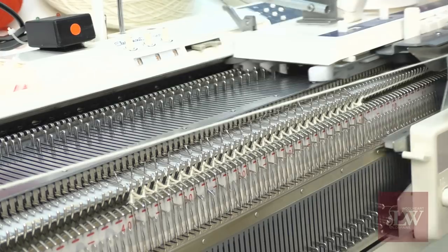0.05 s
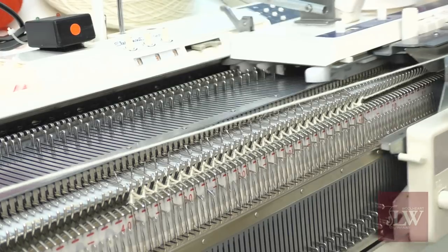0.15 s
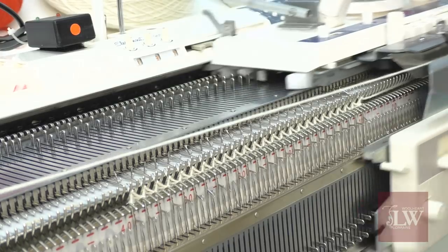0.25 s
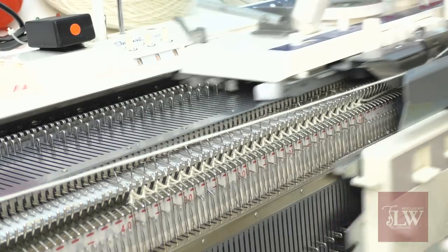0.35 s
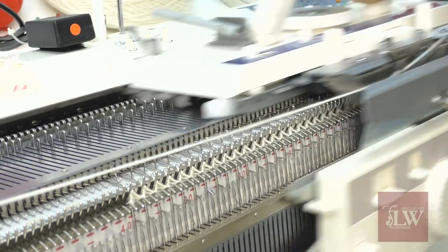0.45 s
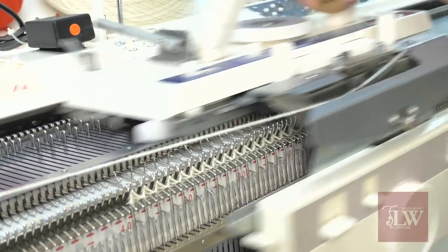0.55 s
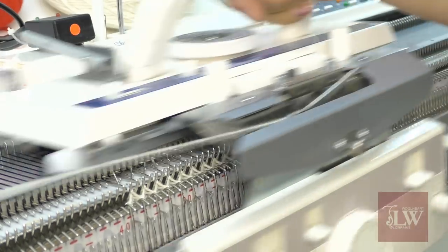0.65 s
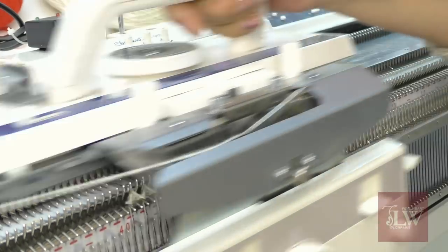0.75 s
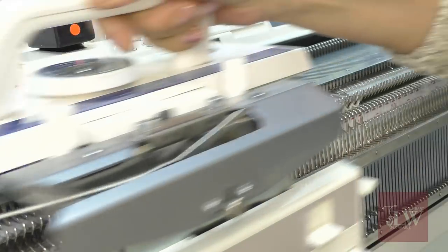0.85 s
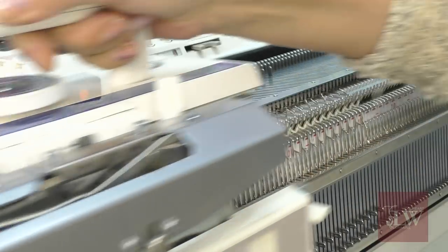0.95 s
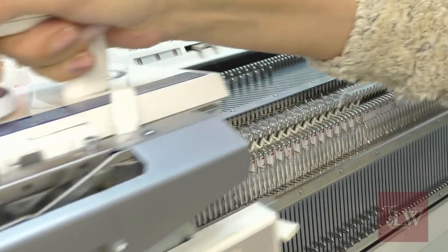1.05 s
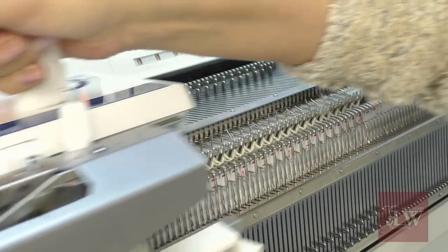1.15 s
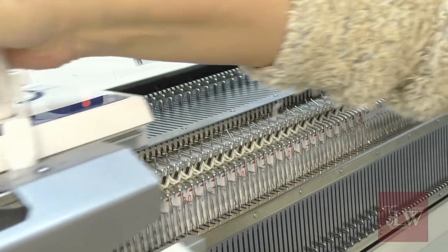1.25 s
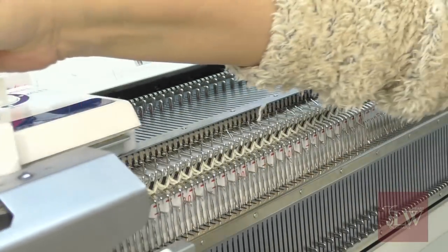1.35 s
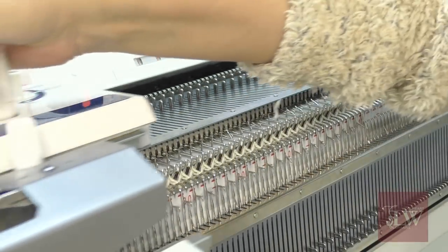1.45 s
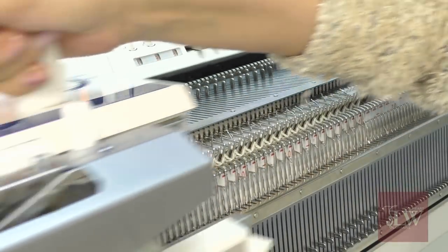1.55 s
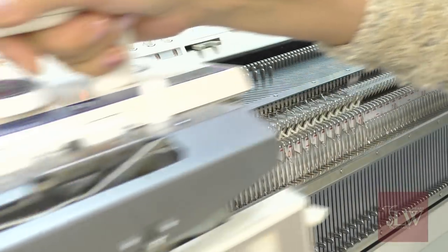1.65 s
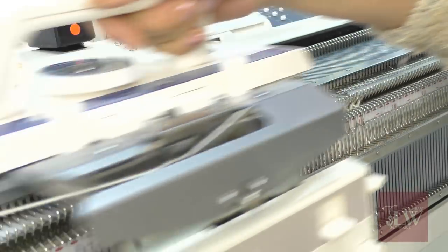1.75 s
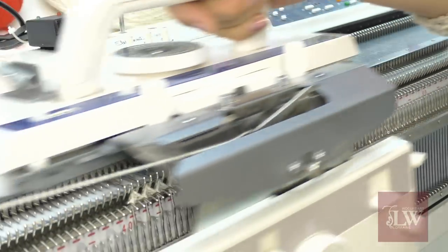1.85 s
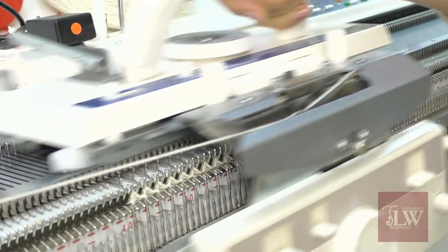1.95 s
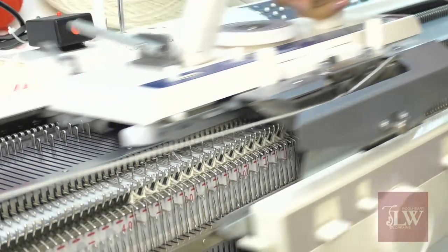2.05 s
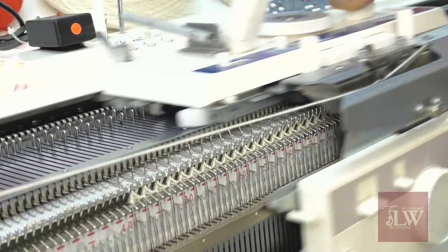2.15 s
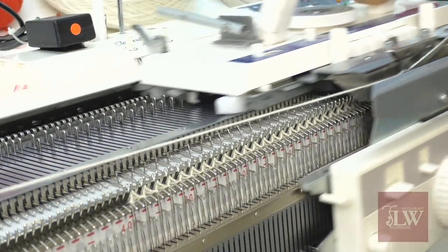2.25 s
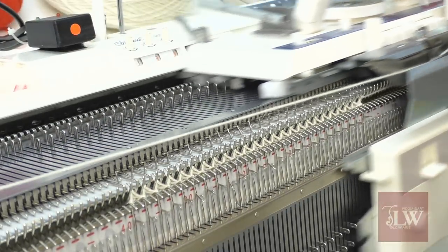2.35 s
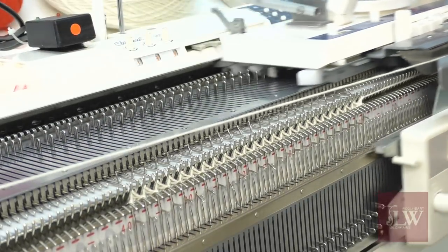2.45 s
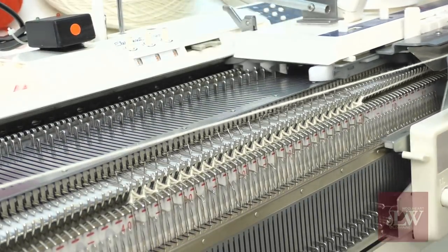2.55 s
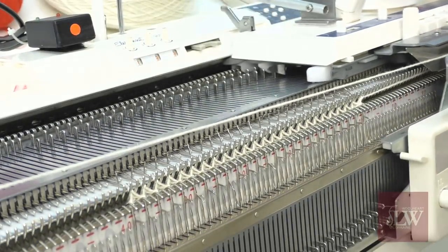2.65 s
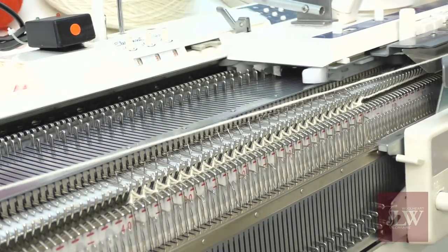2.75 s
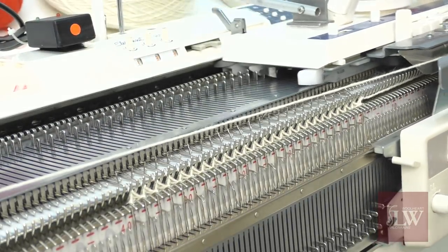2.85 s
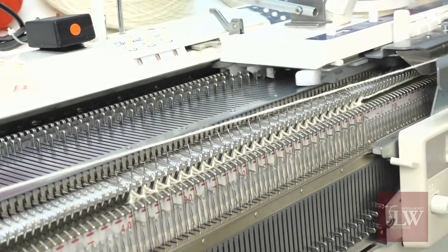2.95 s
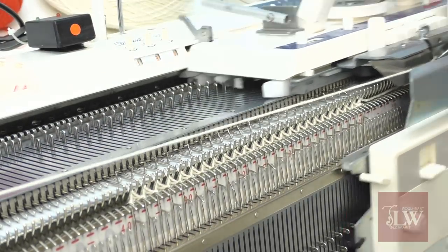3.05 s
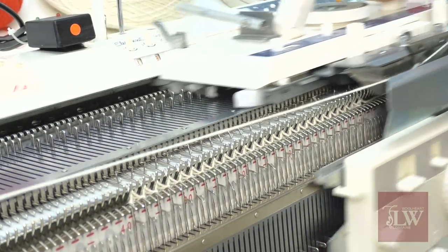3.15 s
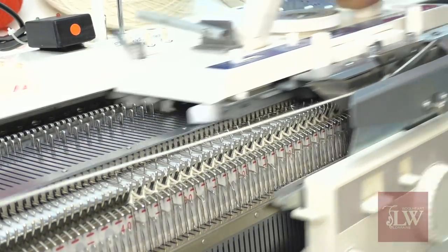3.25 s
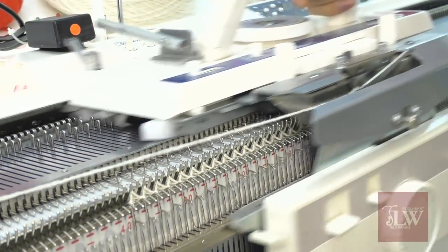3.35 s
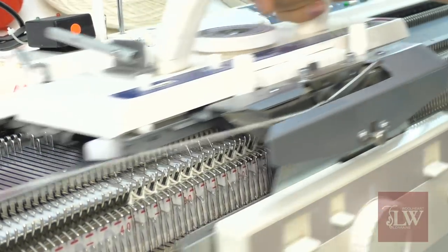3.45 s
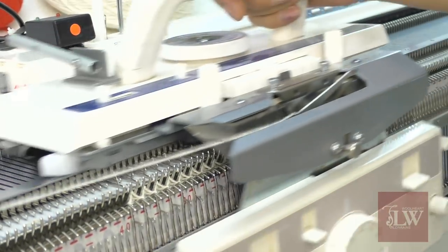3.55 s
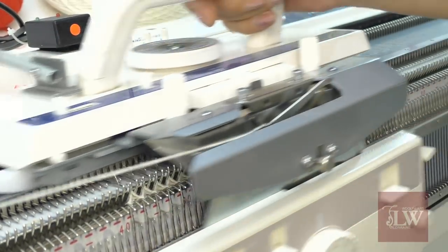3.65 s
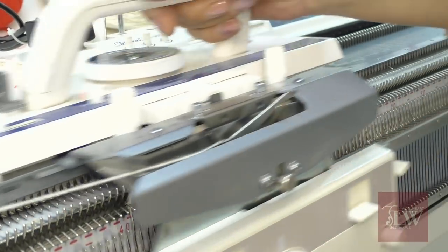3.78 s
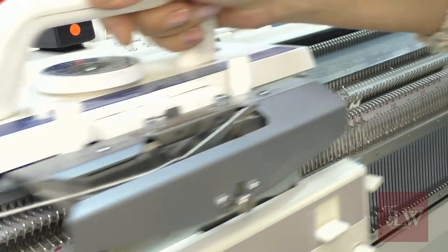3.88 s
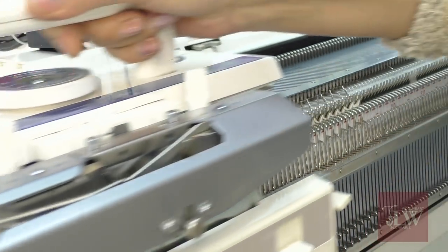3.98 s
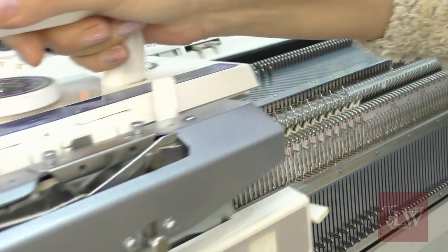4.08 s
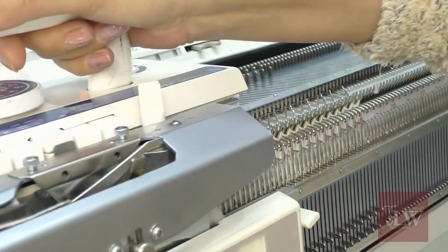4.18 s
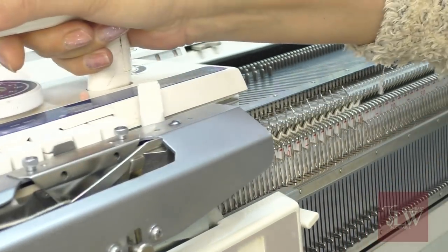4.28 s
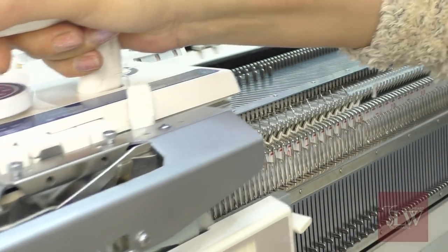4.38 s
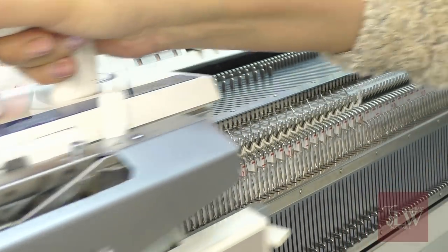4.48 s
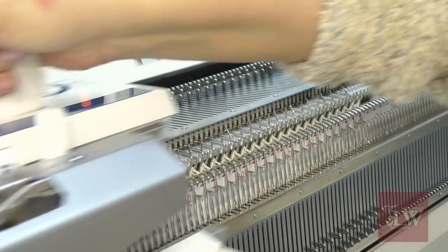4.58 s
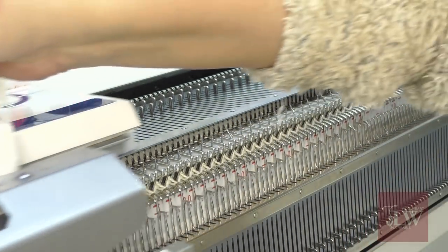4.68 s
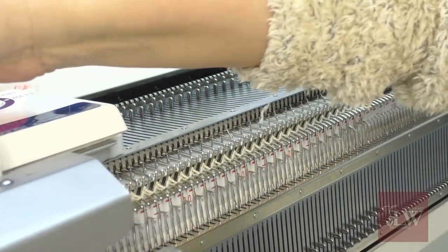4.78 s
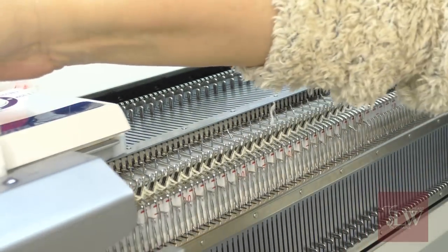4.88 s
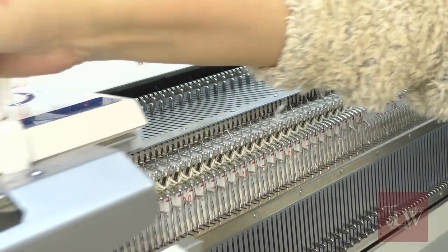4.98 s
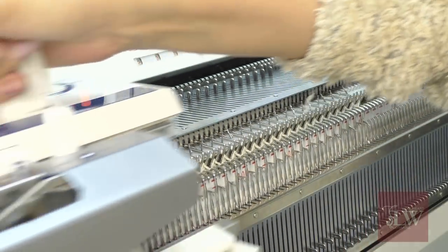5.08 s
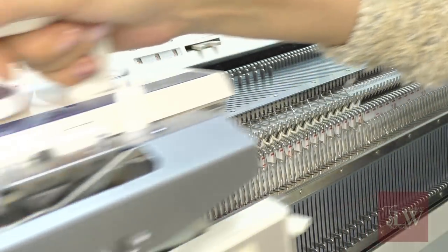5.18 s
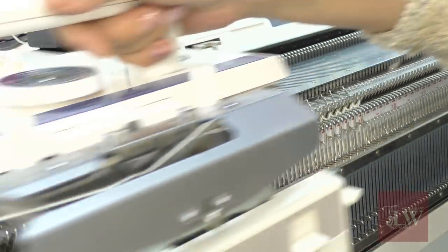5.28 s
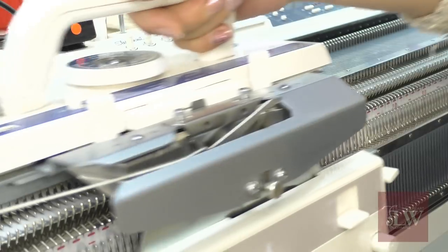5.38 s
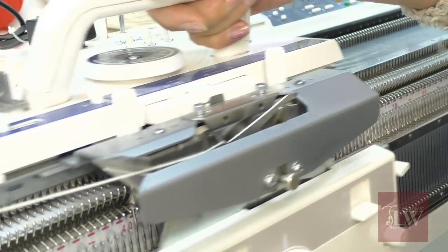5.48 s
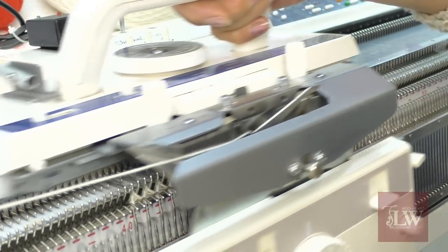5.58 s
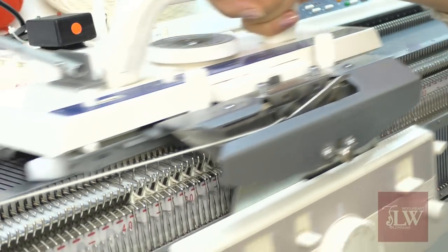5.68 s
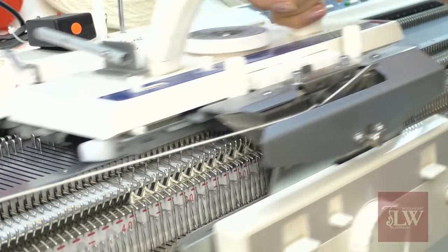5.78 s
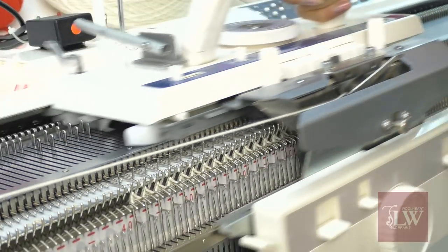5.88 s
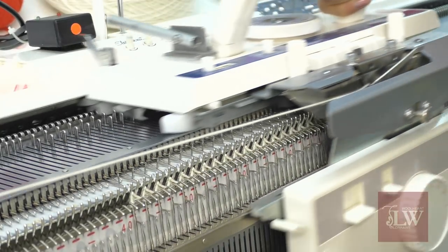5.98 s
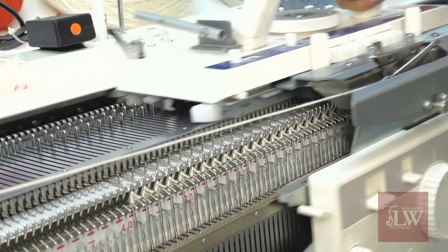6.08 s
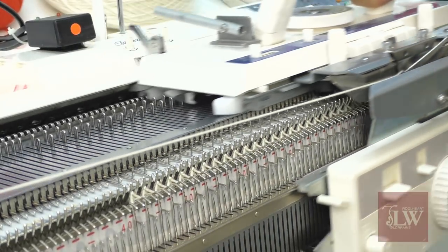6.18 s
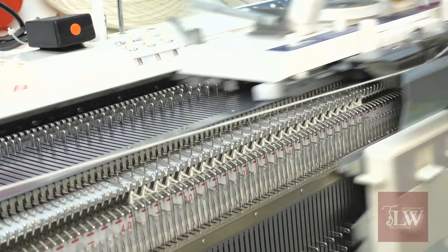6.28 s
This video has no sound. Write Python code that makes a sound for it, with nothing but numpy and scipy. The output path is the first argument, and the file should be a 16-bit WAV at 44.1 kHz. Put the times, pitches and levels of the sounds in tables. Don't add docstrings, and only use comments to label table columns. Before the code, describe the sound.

A small microphone sits close to a knitting machine in a quiet, fairly dry room. Faint handling ticks and a low air swell open the scene. From 0.35 s needles tick in step, and at about 0.55 s a strong gust thumps as the carriage rattles past, metallic and hissy over a hollow plastic drone, with a dull knock at 1.1 s. It nearly stops around 1.3-1.6 s, with low air flutter. At 1.65 s it returns; a sharp tick at 1.84 s leads into crisp latch clicks until 2.3 s, then ticks and near quiet. A tiny gap at 3.08 s marks a cut. A longer stroke rattles from 3.2 to 4.25 s, its rail singing mid-pitched at times. Ticks and a deep air thump follow around 4.5 s, then quiet. From 5.2 s the return rattles, knocks at 5.45 s, gusts heavily at 5.5 s, and ends with softer latch clicks from 5.7 s.

```python
import sys
import numpy as np
from scipy import signal
from scipy.fft import rfft, irfft, next_fast_len
from scipy.io import wavfile
from scipy.ndimage import uniform_filter1d

SR = 44100
rng = np.random.default_rng(int(sys.argv[2]) if len(sys.argv) > 2 else 0)


def bounce(signal):
    frames = np.transpose(np.atleast_2d(signal))
    limited = np.clip(frames, -1, 1)
    pcm = np.round(limited * 32767).astype(np.int16)
    wavfile.write(sys.argv[1], SR, pcm)


def magnitude_from_level(level_db):
    exponent = np.asarray(level_db, float) / 20
    return 10 ** exponent


N = 279133


def rms_one(x):
    return x / np.sqrt(np.mean(x ** 2) + 1e-20)


def in_time(rows):
    s, *columns = np.transpose(rows)
    return [np.interp(np.arange(N) / SR, s, c) for c in columns]


def coloured(x, spectrum):
    size = next_fast_len(N)
    hz = np.maximum(np.arange(size // 2 + 1) * SR / size, 1)
    point_hz, point_db = np.transpose(spectrum)
    gain = magnitude_from_level(np.interp(np.log(hz), np.log(point_hz), point_db))
    return rms_one(irfft(rfft(x, size) * gain, size)[:N])


def band(x, low_hz, high_hz, order=2):
    return signal.sosfilt(signal.butter(order, [low_hz, high_hz], "band", fs=SR, output="sos"), x)


def resonance(x, hz, width_hz):
    r = np.exp(-np.pi * width_hz / SR)
    top = np.array([1, 0, -1]) * (1 - r * r) / 2
    return signal.lfilter(top, [1, -2 * r * np.cos(2 * np.pi * hz / SR), r * r], x + 1e-18)


def body(x, modes):
    rung = 0
    for k, (hz, width_hz, db) in enumerate(modes):
        rung = rung + (-1) ** k * magnitude_from_level(db) * resonance(x, hz, width_hz) / np.sqrt(width_hz)
    return rms_one(rung)


def drift(per_s):
    r = np.exp(-2 * np.pi * per_s / SR)
    return rms_one(signal.lfilter([1], [1, -2 * r, r * r], rng.standard_normal(N + SR))[SR:])


def random_sizes(spread_db, limit):
    return magnitude_from_level(spread_db * np.minimum(rng.exponential(1, N), limit)) * rng.choice([-1, 1], N)


def in_step(first_s, last_s, number, slowing=0):
    along = np.linspace(0, 1, int(round(number)))
    return first_s + (last_s - first_s) * (along - slowing * along * (1 - along)), along


# pitch in Hz, level in dB per Hz.
HUSH_SPECTRUM = [(35, -44), (60, -12.5), (115, -12.5), (339, -27.5), (605, -25), (711, -37.5), (1180, -47),
                 (1420, -41), (14000, -65), (15000, -63)]


def room_hush():
    return magnitude_from_level(-61) * coloured(band(rng.standard_normal(N), 180, 17000), HUSH_SPECTRUM)


# start in seconds, end in seconds, pitch in Hz, level in dB.
SPRING_RINGS = [(0.1, 0.262, 4340, -66.5), (2.6, 3.062, 4400, -80.5), (2.55, 2.68, 5690, -79),
                (2.572, 2.7, 11670, -89), (3.282, 3.324, 1500, -37), (3.435, 3.485, 4280, -41),
                (4.31, 4.37, 5700, -71)]


def spring_rings():
    out, t = np.zeros(N), np.arange(N) / SR
    for start, end, hz, level_db in SPRING_RINGS:
        fade = np.clip(np.minimum(t - start, end - t) / 0.0092, 0, 1)
        tone = np.sin(2 * np.pi * hz * t + 0.4 * drift(40))
        out += magnitude_from_level(level_db) * fade * magnitude_from_level(1.5 * drift(30)) * tone
    return out


def room(x):
    t60_s, level_db = 0.13, -14.5
    t = np.arange(SR // 2) / SR
    tail = band(rng.standard_normal(len(t)), 200, 6700, order=1) * magnitude_from_level(-60 * t / t60_s)
    tail = tail * (t > 0.004)
    return magnitude_from_level(level_db) * signal.fftconvolve(x, tail / np.sqrt(np.sum(tail ** 2)))[:N]


def lumps(low_hz, high_hz, even=0.6):
    x = rms_one(band(rng.standard_normal(N + SR), low_hz, high_hz, order=3)[SR:])
    height = np.sqrt(uniform_filter1d(x ** 2, size=int(SR / low_hz)) + 0.056)
    return rms_one(x / height ** even)


# time in seconds, level of the deep lumps in dB, level of the faster eddies in dB relative to them.
AIR_PUSHES = [
    [(0.0, -47, 7), (0.06, -27, -17), (0.382, -54, 5), (0.52, -34, -18)],
    [(0.535, -26, 6), (0.677, -30.5, 11.5), (0.937, -27.5, -1.5), (1.2, -44, -10)],
    [(1.225, -28.5, 7.5), (1.311, -27.5, 6.5), (1.619, -38.5, -17), (1.84, -47, -12)],
    [(1.855, -25.5, 6.5), (2.067, -35, 5), (2.149, -47, 7), (2.625, -37.5, -30), (2.783, -38.5, -21),
     (2.925, -44.5, -5), (3.07, -59, -0.5)],
    [(3.09, -31, -21), (3.19, -25.5, -43), (3.5, -23.5, -6), (3.88, -31, -5.5), (4.25, -44, 4)],
    [(4.53, -16.5, -25), (4.65, -32.5, -9), (4.87, -41.5, -11), (5.01, -35, -14), (5.23, -57.5, 5),
     (5.49, -32, -5)],
    [(5.51, -35.5, 10), (5.772, -26, 7), (6.012, -24.5, -2), (6.194, -29, -5), (6.33, -37.5, -25.5)],
]
# start in seconds, peak of the first swing in dB, pitch of the swing in Hz,
# level of the flutter in dB, time the flutter holds in seconds.
GUST_STARTS = [(0.544, -17, 22.6, -32.5, .3), (1.232, -33, 40, -53, 0.025), (1.295, -21, 14.6, -62, 0.0054),
               (1.861, -26, 25, -30.5, 0.07), (3.176, -21.5, 11, -68, .05), (5.503, -13, 25.2, -31.5, 0.18)]


def air():
    deep_db, eddies_db = in_time(np.vstack(AIR_PUSHES))
    out = magnitude_from_level(deep_db) * (magnitude_from_level(-0.55) * lumps(7.1, 22.1) + magnitude_from_level(eddies_db - 4) * lumps(20.6, 53.4))
    force_db, weight_db = effort()
    flutter = magnitude_from_level(force_db + weight_db - 8.5)
    flutter = flutter + magnitude_from_level(deep_db + eddies_db - 20.5)
    t = np.arange(N) / SR
    for s, peak_db, hz, flutter_db, held_s in GUST_STARTS:
        since = np.maximum(t - s, 0)
        out += magnitude_from_level(peak_db + 6) * np.sin(2 * np.pi * since * hz) * np.exp(-1.6 * since * hz)
        fall_db = 125 * np.maximum(since - held_s, 0)
        flutter += magnitude_from_level(flutter_db - fall_db) * np.minimum(since / 0.066, 1)
    soft = lumps(49, 121.2, even=0.2)
    slaps = magnitude_from_level(-21) * lumps(122, 232, even=0.01) * magnitude_from_level(5.8 * drift(17))
    return out + magnitude_from_level(-2.5) * flutter * (soft + slaps)


# time in seconds, drop in dB, recovery in seconds.
LEVEL_DROPS = [(0.552, 9.5, 0.47), (1.868, 8, 0.33), (4.256, 5, 0.071), (4.652, 3.5, 0.14),
               (5.512, 9.5, 0.32)]


def pressed():
    t = np.arange(N) / SR
    gain_db = np.zeros(N)
    for s, drop_db, back_s in LEVEL_DROPS:
        gain_db -= drop_db * (t > s) * np.exp(-np.maximum(t - s, 0) / back_s)
    return magnitude_from_level(gain_db)


# time in seconds, level in dB.
RAIL_LEVEL = [(3.15, -63), (3.388, -35), (3.422, -46), (3.596, -33), (3.64, -55), (3.758, -36.5),
              (4.108, -36), (4.25, -69)]


def rail_ring():
    rail_hz, width_hz = 714, 55
    silent_before, silent_after = [(0, -100), (3.1, -100)], [(4.3, -100)]
    level_db, = in_time(silent_before + list(RAIL_LEVEL) + silent_after)
    once = resonance(rng.standard_normal(N), rail_hz, width_hz)
    return magnitude_from_level(level_db - 5) * rms_one(resonance(once, rail_hz, width_hz))


# time in seconds, peak in dB.
SHELL_KNOCKS = [(.219, -40.5), (1.11, -25.5), (2.508, -38), (2.885, -45), (4.323, -55), (3.086, -37.5),
                (5.45, -23), (5.48, -26)]
# pitch in Hz, width in Hz, level in dB.
SHELL_MODES = [(108.7, 7.6, -9.5), (184.7, 34, -6.5), (269, 49, -7.5), (408, 120, -1.5), (559, 88, 0.5),
               (703, 138, 1.5), (925, 134, -1), (1090, 147, -1.5)]


def knocks():
    blows = np.zeros(N)
    for s, peak_db in SHELL_KNOCKS:
        blows[round(s * SR)] = magnitude_from_level(peak_db)
    rung = np.zeros(N)
    for hz, width_hz, db in SHELL_MODES:
        rung += magnitude_from_level(db) * resonance(blows, hz, width_hz * 0.5) * SR / (np.pi * width_hz)
    return magnitude_from_level(-6.5) * band(rung, 54, 970)


# first time in seconds, last time in seconds, number of latches,
# slowing from 0 to 1, peak in dB.
LATCH_ROWS = [(1.872, 1.9021, 3, 0.05, -20), (1.9194, 2.1828, 15, 0, -16.5), (2.204, 2.3224, 6, 0.22, -20),
              (5.691, 5.854, 7, 0, -27), (5.8725, 6.0587, 7, 0, -26), (6.0936, 6.27, 5, 0.1, -28)]
# pitch in Hz, width in Hz, level in dB.
LATCH_MODES = [(4340, 350, 0.5), (6630, 900, -3), (8570, 820, 3.5), (12300, 2000, -12)]


def ratchet(size=600):
    out, t = np.zeros(N + size), np.arange(size) / SR
    for first_s, last_s, number, slowing, peak_db in LATCH_ROWS:
        for s in in_step(first_s, last_s, number, slowing)[0]:
            scrape = 0.12 * rng.standard_normal(size) * np.exp(-t / 0.0008)
            click = body((t == 0) + scrape, LATCH_MODES)
            at = round(s * SR)
            level = magnitude_from_level(peak_db + 1.5 * rng.standard_normal())
            out[at:at + size] += level * click / np.max(np.abs(click))
    return out[:N]


# time in seconds, peak in dB, ring in Hz, low part in dB relative.
SINGLE_TICKS = [(0.0313, -39, 8780, -8), (0.0548, -32, 6360, 2), (0.3087, -35.5, 7250, -20),
                (0.3608, -39.5, 6800, -8), (0.6056, -21, 8630, -8), (1.1049, -32, 8000, 6),
                (1.1971, -26.5, 6200, -1.5), (1.2309, -28.5, 5840, 2.5), (1.8384, -18, 8060, -26),
                (2.3909, -30, 7100, -20), (2.3957, -24.5, 6200, 2), (2.4727, -38, 6300, -3),
                (2.5007, -33, 7150, 3), (2.603, -45, 6130, -11), (2.7821, -54, 8300, 0),
                (3.0855, -48.5, 8810, 10.5), (3.121, -37, 9100, 5.5), (3.1642, -30.5, 8600, 4.5),
                (3.332, -27, 8600, 10.5), (3.9479, -25, 10300, 8), (4.5473, -29.5, 10400, -14),
                (4.5824, -34, 7230, -12), (4.5905, -24.5, 5700, -1), (4.6205, -29, 5300, -20),
                (4.9013, -61, 5540, 12), (4.929, -54, 5100, 6), (5.1098, -52, 6120, 2),
                (5.461, -26, 10260, -23), (5.6381, -37, 7880, -3), (5.7233, -25, 10100, -20)]
# first time in seconds, last time in seconds,
# number of needles, first level in dB, last level in dB.
STEP_TICKS = [(0.2535, 0.2947, 3, -53, -50), (0.3472, 0.509, 9, -46, -35), (1.245, 1.28, 3, -45, -50),
              (1.3024, 1.4, 4, -52, -57), (1.5952, 1.7702, 8, -53, -29), (3.1963, 3.22, 2, -37, -36),
              (4.1915, 4.2463, 3, -35, -29), (4.3705, 4.4167, 3, -48, -50), (4.4288, 4.5046, 4, -38, -32),
              (4.6987, 4.757, 4, -44, -49), (5.1472, 5.248, 6, -55, -38)]


def tick_rows():
    scatter_db = 2
    rows = list(SINGLE_TICKS)
    for first_s, last_s, number, first_db, last_db in STEP_TICKS:
        times, along = in_step(first_s, last_s, number)
        peak_db = first_db + (last_db - first_db) * along + scatter_db * rng.standard_normal(len(times))
        ring_hz = rng.uniform(5800, 10500, len(times))
        low_db = -13 + 2 * scatter_db * rng.standard_normal(len(times))
        rows += zip(times, peak_db, ring_hz, low_db)
    return rows


def ticks(size=2200):
    out, t = np.zeros(N + size), np.arange(size) / SR
    rise = 1 - np.exp(-t / 0.0005)
    for s, peak_db, hz, low_db in tick_rows():
        crack, knock, tail = rng.standard_normal((3, size))
        sharp = band(crack * rise * np.exp(-t / 0.0022), 3800, 11500)
        ring = resonance(crack * rise * np.exp(-t / 0.003), min(hz, 12500), 450)
        high = sharp / np.max(np.abs(sharp)) + 0.5 * ring / np.max(np.abs(ring))
        low = band(knock * np.exp(-t / 0.0051), 510, 4500)
        low = magnitude_from_level(low_db - 2.5) * low / np.max(np.abs(low))
        rustle = 0.3 * band(tail, 3000, 12000) * np.exp(-t / 0.009)
        at = round(s * SR)
        out[at:at + size] += magnitude_from_level(peak_db) * (high + rustle + low)
    return out[:N]


# time in seconds, force of the cams on the needles in dB,
# weight on the shell in dB relative to it.
FIRST_STROKES = [
    [(0.0, -53.5, 5), (0.08, -61, 12.5), (0.2, -77, 16.5)],
    [(0.3, -68, 17.5), (0.55, -41, -2.5), (0.68, -42.5, 1.5), (0.84, -49.5, 2.5), (0.93, -40, 2),
     (1.08, -42, 4), (1.19, -61.5, 11.5), (1.25, -58, 5.5), (1.46, -84.5, 14.5)],
    [(1.65, -63, 10), (1.67, -46, -3), (1.838, -32.5, -3.5), (1.93, -42.5, 1.5), (2.23, -40.5, 3),
     (2.41, -55, 9), (2.6, -69, 10), (2.726, -87.5, 25.5), (3.07, -86, 18.5)],
]
# time in seconds, force in dB, weight in dB relative to
LATER_STROKES = [
    [(3.086, -60, 13.5), (3.312, -40.5, -1), (3.57, -41.5, 3), (3.96, -40, 7), (4.094, -42.5, 7),
     (4.25, -57, 15), (4.33, -80, 22)],
    [(4.415, -74.5, 25.5), (4.43, -56.5, 5), (4.47, -55, 10.5), (4.49, -54.5, 20), (4.57, -55, 11),
     (4.63, -51, 5), (4.788, -72, 15.5), (5.038, -82, 22)],
    [(5.2, -62, 7.5), (5.22, -49.5, -2.5), (5.32, -36.5, -4), (5.42, -34, -1.5), (5.51, -51, 8),
     (5.57, -61, 2.5)],
    [(5.69, -46.5, 7.5), (5.93, -52, 3.5), (6.06, -47, 6.5), (6.25, -54.5, 5), (6.33, -52.5, 1.5)],
]


def effort():
    return in_time(np.vstack(list(FIRST_STROKES) + list(LATER_STROKES)))


def contacts(per_s, spread_db, slide):
    blows = rms_one(random_sizes(spread_db, 5) * (rng.random(N) < per_s / SR))
    return rms_one(blows + slide * rng.standard_normal(N))


def needle_cycle(slack_db):
    per_s = 46 - 1.34 * slack_db
    phase = (np.cumsum(per_s) / SR + 0.12 * drift(20)) % 1
    burst = np.exp(-2.2 * phase)
    share = np.clip(0.3 + 0.025 * slack_db, 0, 0.6)
    gate = 1 - share + share * burst / np.mean(burst)
    unevenness = np.mean(burst ** 2) / np.mean(burst) ** 2 - 1
    return gate / np.sqrt(1 + share ** 2 * unevenness)


def jingle(gate, per_s, low_hz, high_hz, cycles, count=14):
    blows = random_sizes(5.7, 4) * gate * (rng.random(N) < per_s / SR)
    dealt = rng.integers(0, count, N)
    out = np.zeros(N)
    for k, hz in enumerate(np.geomspace(low_hz, high_hz, count)):
        out += resonance(blows * (dealt == k), hz, hz / cycles)
    return rms_one(out)


# pitch in Hz, level in dB per Hz.
NEEDLE_SPECTRUM = [(1760, -83), (3000, 11), (3450, -12), (4800, -6), (5710, 6), (6570, 2), (9140, 5.5),
                   (11000, 2), (15000, -6), (16000, -3)]
# pitch in Hz, width in Hz, level in dB.
NEEDLE_MODES = [(3940, 160, 2.5), (5700, 450, -16), (6800, 300, -24), (8240, 150, 33), (9800, 3600, 27.5),
                (10300, 130, 16)]
# pitch in Hz, width in Hz, level in dB.
PLATE_MODES = [(1402, 420, 0), (2190, 510, 5), (2316, 175, 4.5), (2980, 455, 0.5), (3616, 307, 1.5),
               (3934, 800, 2)]


def carriage():
    force_db, weight_db = effort()
    slack_db = -40 - force_db
    cycle = needle_cycle(slack_db) * magnitude_from_level(0.5 * drift(6.3))
    blows = contacts(per_s=3600, spread_db=2, slide=0.95) * cycle

    rings = band(body(blows, NEEDLE_MODES), 3500, 17000)
    needles = rms_one(coloured(blows, NEEDLE_SPECTRUM) + 0.42 * rings)
    needles = rms_one(needles + 0.45 * jingle(cycle, 700, 5500, 11500, cycles=22))
    needles_db = 5.5 + 0.03 * slack_db

    plate = rms_one(band(body(blows + 0.45 * rng.standard_normal(N), PLATE_MODES), 1120, 6300))
    plate = rms_one(plate + 0.3 * jingle(cycle, 400, 1400, 4500, cycles=14))
    plate_db = 2 + 0.39 * weight_db + 2.07 * drift(4.2)

    shell = body(contacts(per_s=600, spread_db=3.5, slide=1.48) * np.sqrt(cycle), SHELL_MODES)
    shell_db = weight_db + 0.5 + 1.2 * drift(10.3)
    return magnitude_from_level(force_db) * (magnitude_from_level(needles_db) * needles + magnitude_from_level(plate_db) * plate + magnitude_from_level(shell_db) * shell)


def scene():
    machine = carriage() + ticks() + ratchet() + knocks() + rail_ring()
    background = room_hush() + spring_rings()
    return (pressed() * (machine + room(machine)) + air() + background)[None]


def rounded(x, top):
    return x / (1 + np.abs(x / top) ** 6) ** (1 / 6)


def roll_off(x):
    return signal.sosfilt(signal.butter(12, 16520, fs=SR, output="sos"), x)


# start in seconds, end in seconds.
GAP_S = (3.078, 3.0845)


def record(dry):
    ceiling, top_hz = 0.22, 16050
    t = np.arange(N) / SR
    kept = 1 - 1.0 * ((t > GAP_S[0]) & (t < GAP_S[1]))
    low = signal.sosfiltfilt(signal.butter(2, 150, fs=SR, output="sos"), dry)
    rest = (dry - low) * kept
    x = rounded(rounded(low, 0.8 * ceiling) + rest, ceiling)
    x = signal.sosfilt(signal.cheby2(12, 60, top_hz + 350, fs=SR, output="sos"), x)
    return roll_off(x)


dry = scene()
out = record(dry)
bounce(out)
```